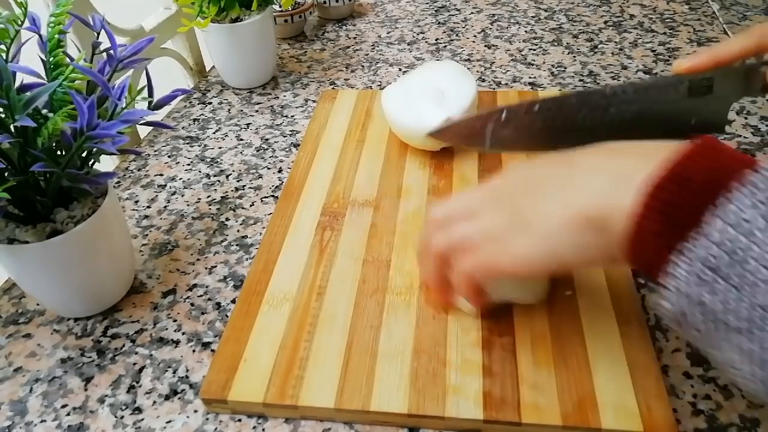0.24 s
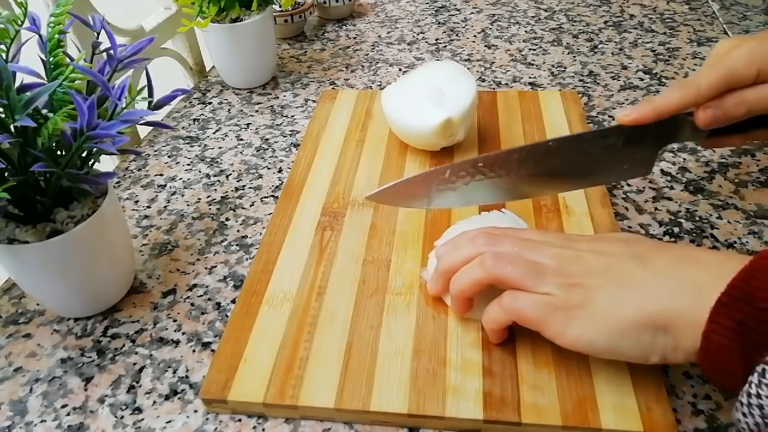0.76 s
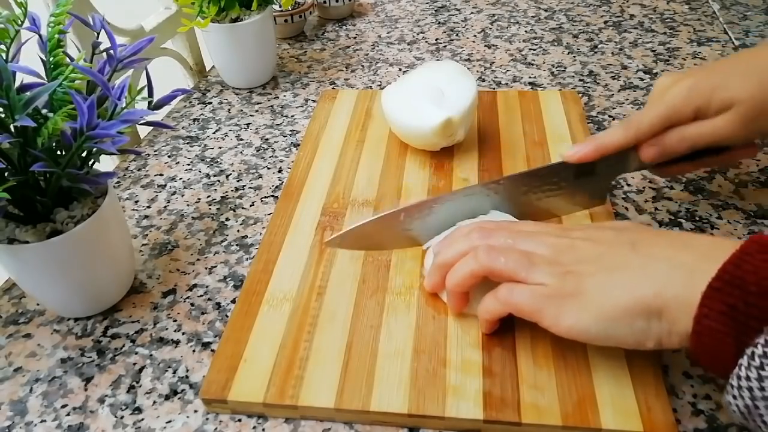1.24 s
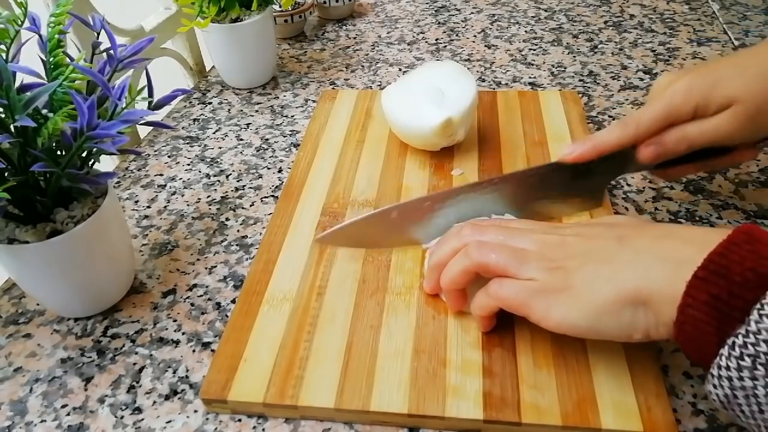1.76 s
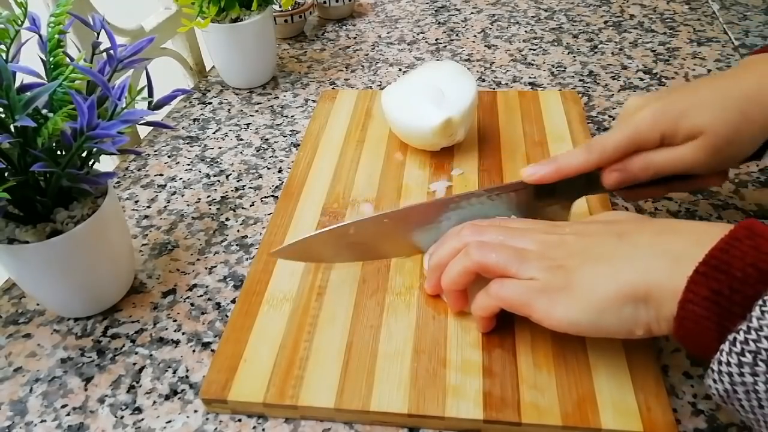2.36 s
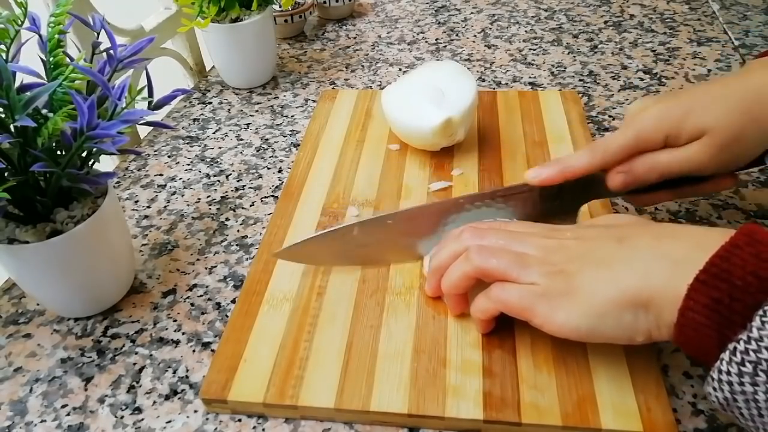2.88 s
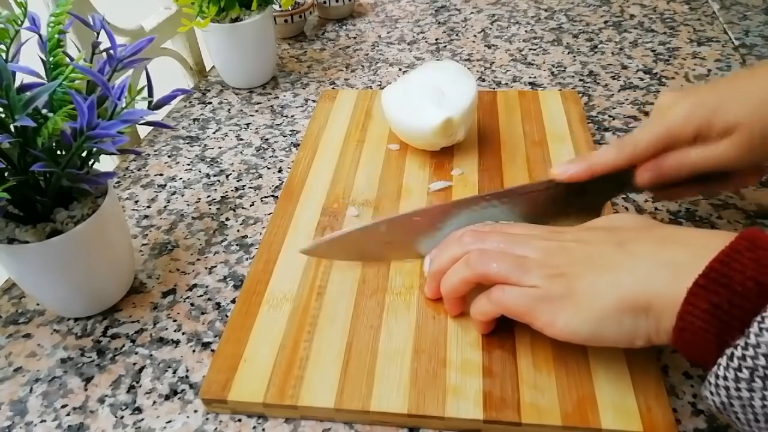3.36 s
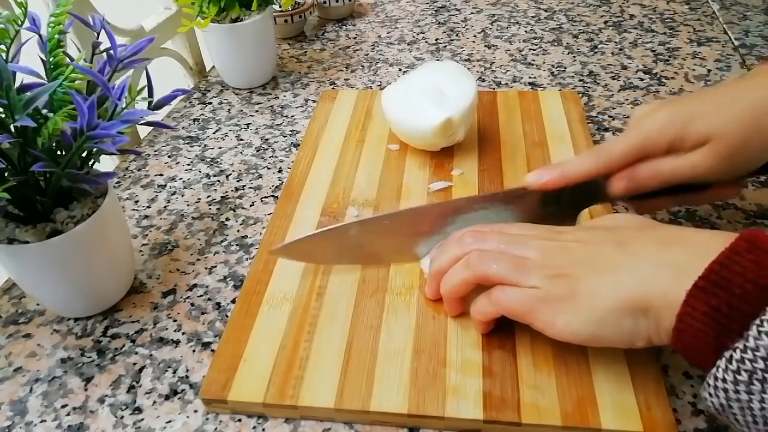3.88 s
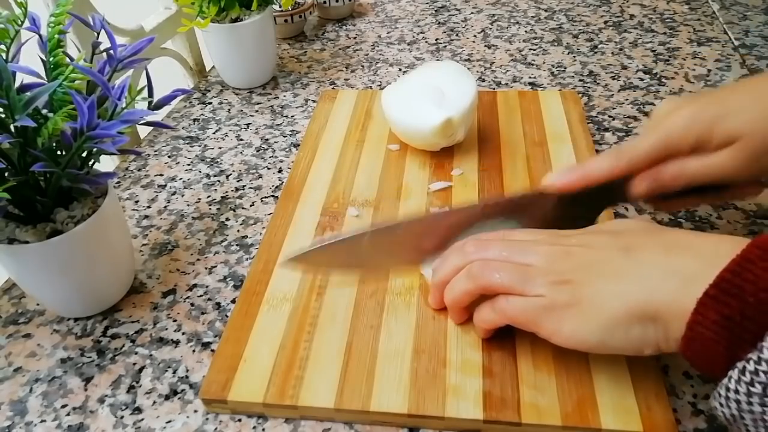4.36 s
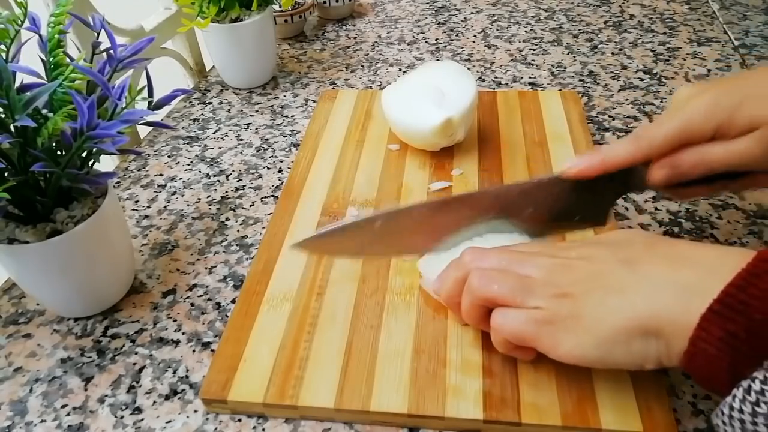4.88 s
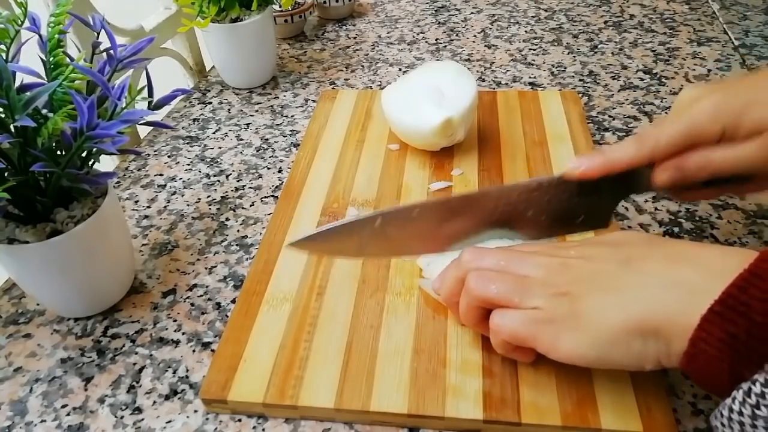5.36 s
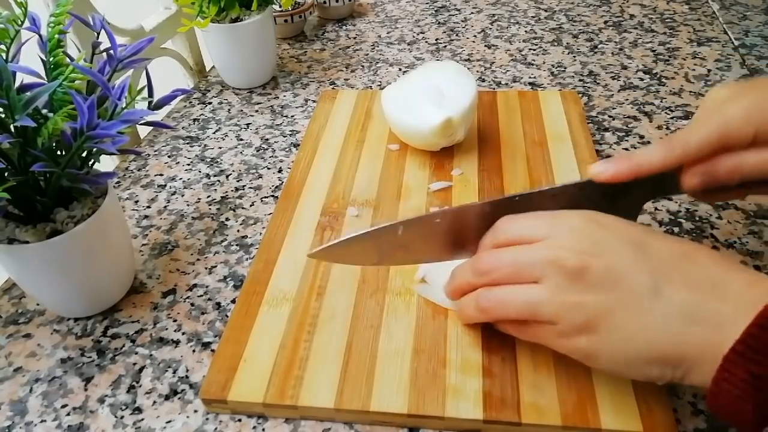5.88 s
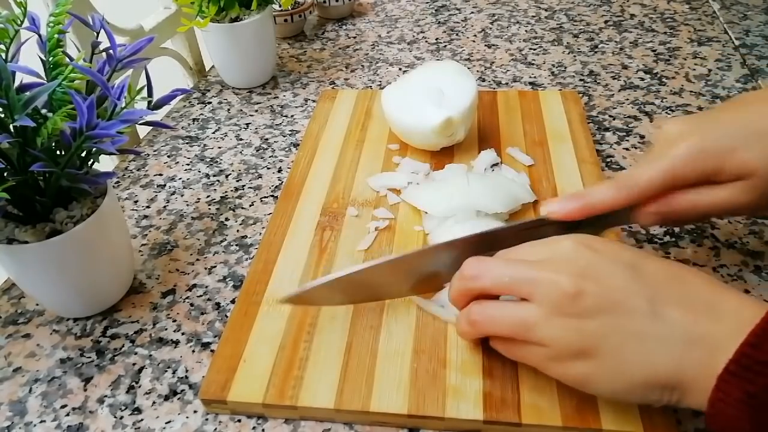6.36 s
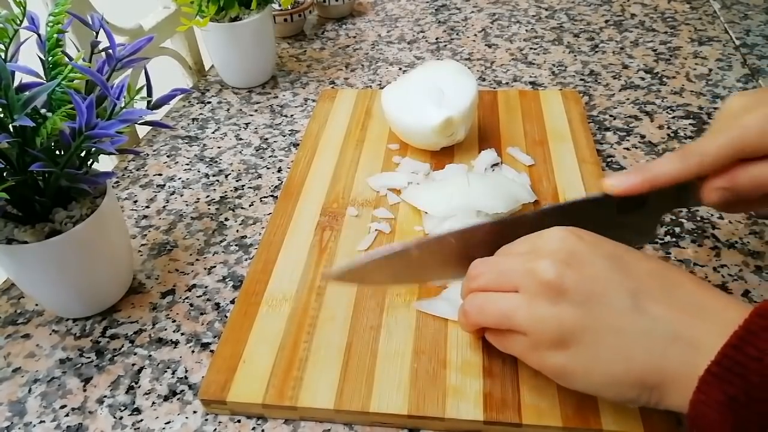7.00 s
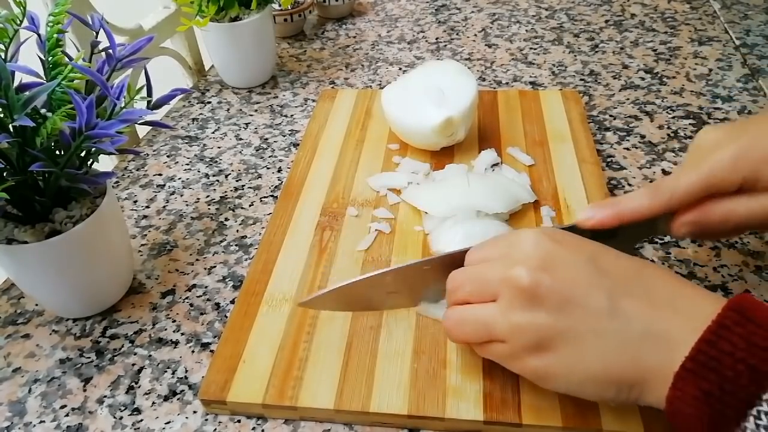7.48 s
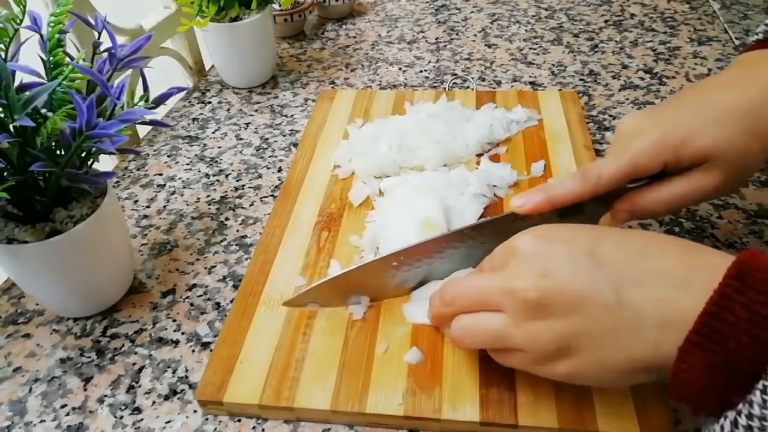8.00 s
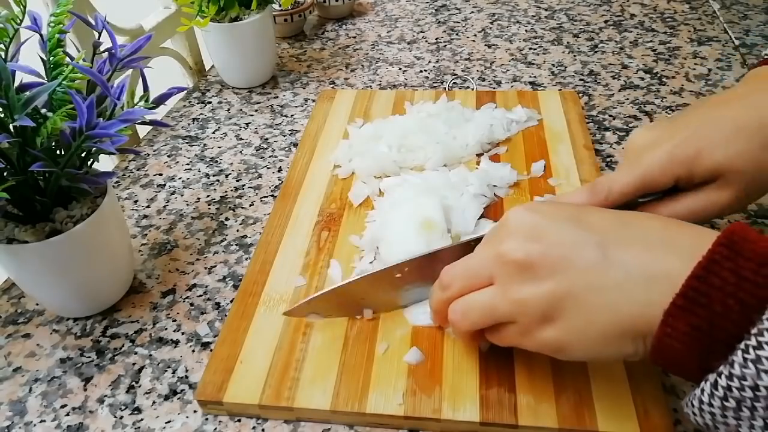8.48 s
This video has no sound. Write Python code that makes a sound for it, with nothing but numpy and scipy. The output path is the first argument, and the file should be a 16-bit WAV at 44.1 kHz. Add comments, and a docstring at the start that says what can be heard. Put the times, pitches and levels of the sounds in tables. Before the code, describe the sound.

Close to the microphone, a knife crunches through onion layers and knocks on a wooden cutting board at an even, unhurried pace. The knocks vary in force, with two sharp ones near the middle, and ring briefly in a small kitchen over low hiss and faint hand rubbing. Late on, everything fades out, then cuts back in for three more strokes and a tiny squeak.

```python
"""A small kitchen: a chef's knife dices an onion on a wooden board on a stone counter, heard close up.
Each stroke crunches through bursting cells and snapping layers, then knocks on the board, ringing its
modes and the room; hard hits click and bounce. Behind: hand rub, hiss, a brief hum, one faint squeak.
The sound fades out once and returns abruptly for the last three strokes."""
import sys
import numpy as np
from scipy import signal
from scipy.fft import rfft, irfft, next_fast_len
from scipy.io import wavfile
from scipy.ndimage import uniform_filter1d

SR = 44100
rng = np.random.default_rng(int(sys.argv[2]) if len(sys.argv) > 2 else 0)


def master_out(mix):
    """Clip the mix to full scale and print it as 16-bit PCM to the path in sys.argv[1]."""
    frames = np.transpose(np.atleast_2d(mix))
    ceiling = np.clip(frames, -1, 1)
    pcm = np.round(ceiling * 32767).astype(np.int16)
    wavfile.write(sys.argv[1], SR, pcm)


N = 385434

# knife strokes: [contact t/s, knock level/dB, hardness f/Hz, crunch level/dB, crunch lead/s, arm lean/dB]
KNIFE_STROKES = [(0.9849, -19, 860, -55.5, 0.016, -54.5), (1.6512, -26, 860, -55, 0.047, -59),
                 (2.1277, -16.5, 870, -54, 0.063, -51.5), (2.6898, -10.5, 1060, -55, 0.042, -48.5),
                 (3.1867, 0.5, 2434, -56, 0.0027, -54.5), (3.7430, -18, 780, -53.5, 0.034, -46.5),
                 (4.2685, -15, 980, -51.5, .055, -47), (4.7781, -2.5, 1850, -51, 0.026, -48.5),
                 (5.3330, -28.5, 624, -53, 0.064, -46.5), (5.8609, -23, 1070, -55, 0.003, -50.5),
                 (6.607, -13, 1630, -62, 0.0028, -60), (7.0404, -21.5, 923, -59.5, 0.027, -59.5),
                 (7.3553, -26.5, 997, -61.5, .005, -63), (7.7073, -15, 2250, -66, .004, -67.5),
                 (8.1910, -18.5, 1780, -61, 0.014, -62), (8.6230, -19.5, 1560, -62.5, 0.008, -64)]
# loudest onion layers snapping: [t/s, level/dB]
LAYER_SNAPS = [(0.9844, -30), (2.662, -40), (4.19, -34), (4.2023, -45), (5.8512, -34)]
# board modes: [f/Hz, width/Hz, level/dB, left minus right/dB, bearing (<= -1 right, >= 1 left)]
BOARD_MODES = [(134.1, 19, -20, -3.5, 1), (300.2, 11, 2, 2.5, -3.8), (462.7, 23, -2, -2, 0.41),
               (548, 53, -2.5, 6, -1.2), (654, 17, -9.5, -7.5, 0.89), (797, 58, -12.5, 11, -0.7),
               (784, 200, -14.5, 8, -2.8), (922, 15, -2.5, 7, 0.39), (963, 23, -10, -13.5, 0.28),
               (1065, 110, 2.5, 4.5, 0.64), (1148, 55, -9, -9.5, -2.5), (1360, 77, -2, -12, 0.98),
               (1400, 14, -9, 19, -0.26), (1534, 60, -1.5, -1.5, 0.29), (1652, 220, -5.5, -10, 0.23),
               (1730, 110, -10.5, 15.5, -1.3), (1950, 70, -14.5, 13.5, .4), (2140, 17, -7, -11.5, 0.031),
               (2280, 18, -11.5, 15, 1), (2250, 78, -23, 10, -1.3), (2840, 300, -31, -14, 0.82),
               (3430, 170, -28, 5.5, -1.3)]
# spectrum of bursting cells: [f/Hz, relative level/dB]
CRUNCH_SPECTRUM = [(30, -2), (80, -4), (180, 9.5), (300, 12.5), (620, 6.5), (1000, 3.5), (1500, -20),
                   (2100, -1.5), (3200, 5.5), (5000, -0.5), (8000, -4.5), (10000, 0), (12000, -14)]
# standing waves of the kitchen: [f/Hz, width/Hz, level/dB]
ROOM_MODES = [(127.5, 3.5, 11.5), (132.5, 4, 12.5), (255, 7, -4), (298, 11, -1.5), (316, 11, 3.5)]
# first reflections off tiles and cupboards: [delay/s, left level/dB, right level/dB]
REFLECTIONS = [(.0042, -7, -12), (.0092, -15, -18), (.0268, -16, -18)]
# reverberation time: [f/Hz, t60/s]
ROOM_DECAY = [(150, 0.91), (400, 0.33), (1100, 0.53), (2500, 0.38), (5000, 0.27), (10000, 0.16)]
# fingers regripping the onion: [t/s, level/dB]
FINGER_GRIPS = [(.2, -74), (1.95, -73), (2.56, -64), (4.0, -82), (5.62, -65.5), (8.52, -68.5)]
# room and microphone hiss: [f/Hz, relative level/dB]
HISS_SPECTRUM = [(25, -1), (60, -7), (125, 2), (190, -2), (350, 1), (630, -1), (1200, 0), (1550, -4.5),
                 (2200, -1), (2800, 1.5), (3200, -3.5), (7000, -7.5), (9700, -10.5), (12000, -15)]

FADE_START_S, SILENT_S, RETURN_S, FADE_IN_S = 5.9, 7.465, 7.508, .017
TOP_HZ = 11600
TIME_S = np.arange(N) / SR
N_FFT = next_fast_len(N + SR)
FREQ_HZ = np.maximum(np.fft.rfftfreq(N_FFT, 1 / SR), 1e-3)


def knocks(wood, rattle_db=-12, rattle_s=.0044, click_s=.0016, neutral_db=-15, weight_hz=600):
    """The edge strikes the board: onion cushions the push, a clean hit reaches the high modes."""
    t = TIME_S[:SR // 20]
    ring, impulse = irfft(wood[0], N_FFT)[:len(t)], signal.unit_impulse(len(t))
    burst = lambda decay_s: noise_burst(t, decay_s) / np.sqrt(decay_s * SR / 2)
    force, rattle, steel = np.zeros(N), np.zeros((2, N)), np.zeros(N)
    for at_s, db, hard_hz, *_ in KNIFE_STROKES:
        blow = impulse + undb(-19) * burst(.0011)  # each spot favours other modes
        push = signal.lfilter(*signal.butter(3, hard_hz, fs=SR), blow)
        bass_gain = undb(.55 * (neutral_db - db))  # lighter knocks weigh more in the low modes
        push = push + (bass_gain - 1) * signal.lfilter(*signal.butter(1, weight_hz, fs=SR), push)
        gain = undb(db) / np.abs(signal.fftconvolve(push, ring)).max()
        add(force, at_s, gain * push)
        shared = burst(rattle_s)  # weak, short modes of board and blade, partly alike at both ports
        for channel in rattle:
            shiver = shared + undb(-4) * burst(rattle_s)
            add(channel, at_s, gain * signal.fftconvolve(push, shiver)[:len(t)])
        click_gain = gain * hardness_gain(hard_hz, bare_db=-53, db_per_octave=6)
        add(steel, at_s, click_gain * noise_burst(t, click_s))
    body = filtered(-force, wood) + undb(rattle_db) * filtered(rattle, resonance(1000, 2100) ** 2)
    return body + pan(4) * filtered(steel, resonance(4400, 6200))


def board_response(port_gap_s=.00025):
    """Board modes at both microphone ports; each radiates from its own side."""
    response = 0
    for hz, width_hz, db, pan_db, bearing in BOARD_MODES:
        arrival = np.array([delay(0), delay(port_gap_s * np.clip(bearing, -1, 1))])
        response += undb(db) * pan(pan_db) * resonance(hz, width_hz) * arrival
    return response


def bounces(wood, lag_s=.0069):
    """The edge lands again and rings the board's high modes."""
    hits, high_modes = np.zeros(N), wood * resonance(2200, 900) ** 2
    for at_s, _, hard_hz, *_ in KNIFE_STROKES:
        add(hits, at_s + lag_s, [hardness_gain(hard_hz, bare_db=-14.5, db_per_octave=24.5)])
    return filtered(hits, high_modes) / np.abs(irfft(high_modes, N_FFT)).max()


def hardness_gain(hard_hz, bare_db, db_per_octave, bare_hz=2800):
    """Gain falls from its bare-edge value as onion cushions the contact."""
    return undb(bare_db + db_per_octave * np.log2(hard_hz / bare_hz))


def crunch(wood, cells_per_s=3500, scatter_db=6, clump_db=2.36, tear_db=-6, rasp_db=-14, rumble_db=-10):
    """Cells burst in clumps; the arm's lean drives blade rasp, board ring and counter rumble."""
    effort, pressure = np.zeros(N), np.zeros(N)
    for at_s, _, _, db, lead_s, lean_db in KNIFE_STROKES:
        cut = cut_envelope(at_s, lead_s)
        effort += undb(db) * cut
        pressure += undb(lean_db) * cut
    pops = (rng.random(N) < cells_per_s / SR) * rng.choice([-1, 1], N)
    pops = pops * undb(scatter_db * np.minimum(rng.exponential(size=N), 4))
    tearing = undb(tear_db) * rng.standard_normal(N)
    cells = (unit_rms(pops) + tearing) * undb(clump_db * drift(160))
    shadow = pan(6) ** (FREQ_HZ / (FREQ_HZ + 1500))  # right port shaded from the treble
    airborne = filtered(cells * effort, shadow * unit_rms(spectrum(CRUNCH_SPECTRUM)))
    rasp = undb(rasp_db) * unit_rms(np.abs(resonance(1450, 600)) ** 2)
    board_and_blade = filtered(cells * pressure, 2 * wood * resonance(1400, 2400) + rasp)
    rumble = unit_rms(filtered(diffuse_noise(90), resonance(55, 36) ** 2))
    return airborne + board_and_blade + undb(rumble_db) * rumble * uniform_filter1d(pressure, SR // 10)


def cut_envelope(contact_s, lead_s, build_s=.041, ease_s=.16, release_s=.0047):
    """A cut builds to 1, eases once the blade is through and stops at the board."""
    past_peak_s = TIME_S - (contact_s - lead_s)
    release = np.maximum(TIME_S - contact_s, 0) / release_s
    return np.exp(np.minimum(past_peak_s / build_s, -past_peak_s / ease_s) - release)


def snaps(per_cut=3, over_crunch_db=6, spread_s=.028, scatter_db=3, decay_s=.0005):
    """Whole layers give way in short, bright cracks; lesser ones cluster at each cut's peak."""
    cracks, t = np.zeros(N), TIME_S[:SR // 100]
    lesser = [(min(at_s, at_s - lead_s + spread_s * when), db + over_crunch_db + scatter_db * size)
              for at_s, _, _, db, lead_s, _ in KNIFE_STROKES
              for when, size in rng.standard_normal((per_cut, 2))]
    for at_s, db in LAYER_SNAPS + lesser:
        crack = noise_burst(t, decay_s)
        add(cracks, at_s, undb(db) * crack / np.abs(crack).max())
    return pan(5) * filtered(cracks, resonance(4500, 12000) * spectrum([(9000, 7.5), (12000, -10.5)]))


def kitchen(direct, tail_db=-4, onset_s=.0015, build_s=.012, mode_lag_s=.01167):
    """Hard reflections, beating low standing waves and a short diffuse tail."""
    early = sum(undb([[left_db], [right_db]]) * delay(lag_s) for lag_s, left_db, right_db in REFLECTIONS)
    standing = sum(undb(db) * resonance(hz, width_hz) for hz, width_hz, db in ROOM_MODES)
    hz, t, noise_bins = signal.stft(diffuse_noise(900)[:, :SR], SR, nperseg=256)
    t60_s = np.interp(hz, *np.transpose(ROOM_DECAY))
    decay = np.exp(-np.log(1000) * t / t60_s[:, None])
    onset = np.clip((TIME_S[:SR] - onset_s) / build_s, 0, 1)
    tail = signal.istft(noise_bins * decay, SR)[1][:, :SR] * onset
    tone = spectrum([(100, -5), (300, -6), (600, -1), (1100, -5.5),
                     (2200, -6.5), (5000, 4.5), (10000, -1.5)])
    late = rfft(tail, N_FFT) * tone / np.sqrt(SR / 50)
    return filtered(direct, 1 + early + standing * delay(mode_lag_s) + undb(tail_db) * late)


def hand_rub(rest_db=-72.5, grip_half_s=.09, waver_db=3.5):
    """Hand and onion rub unsteadily on the board, swelling at each new grip."""
    grips = sum(undb(db) * np.exp(-((TIME_S - at_s) / grip_half_s) ** 2) for at_s, db in FINGER_GRIPS)
    friction = unit_rms(filtered(diffuse_noise(900), resonance(320, 160) ** 2))
    return friction * (undb(rest_db) + grips) * undb(waver_db * drift(21))


def faint_tone(start_s, end_s, from_hz, to_hz, db):
    """A wavering, gliding tone that swells and dies."""
    progress = np.clip((TIME_S - start_s) / (end_s - start_s), 0, 1)
    swell = np.sqrt(np.abs(np.sin(np.pi * progress)))
    hz = np.interp(TIME_S, [start_s, end_s], [from_hz, to_hz]) * (1 + .0046 * drift(26))
    return undb(db) * swell * np.sin(2 * np.pi * np.cumsum(hz) / SR)


def hiss(early_db=-59.5, late_db=-63):
    """Room and microphone noise, lower after the fade."""
    noise = unit_rms(filtered(diffuse_noise(900), spectrum(HISS_SPECTRUM) * (FREQ_HZ < TOP_HZ)))
    return noise * undb(np.where(TIME_S < RETURN_S, early_db, late_db))


def diffuse_noise(coherent_hz):
    """Noise from all around: alike at both ports in the bass, unrelated in the treble."""
    coherence = 1 / (1 + (FREQ_HZ / coherent_hz) ** 2)
    mid, side = filtered(rng.standard_normal((2, N)), np.sqrt([1 + coherence, 1 - coherence]))
    return np.array([mid + side, mid - side]) / np.sqrt(2)


def noise_burst(t, decay_s):
    """Exponentially decaying white noise."""
    return rng.standard_normal(len(t)) * np.exp(-t / decay_s)


def drift(rate_hz):
    """Random curve, spread near 1."""
    return np.interp(TIME_S * rate_hz, np.arange(1000), rng.standard_normal(1000))


def resonance(hz, width_hz):
    """Response of one damped mode, gain 1 at centre."""
    return 1 / (1 + 1j * (FREQ_HZ ** 2 - hz ** 2) / (FREQ_HZ * width_hz))


def spectrum(points):
    """Gain curve through (f/Hz, level/dB) points."""
    hz, db = np.transpose(points)
    return undb(np.interp(np.log(FREQ_HZ), np.log(hz), db))


def delay(lag_s):
    """Response of a pure delay."""
    return np.exp(-2j * np.pi * FREQ_HZ * lag_s)


def filtered(x, response):
    """Apply a frequency response."""
    return irfft(rfft(x, N_FFT) * response, N_FFT)[..., :N]


def pan(db):
    """Stereo gains for a left-minus-right level."""
    return undb(np.array([[db], [-db]]) / 2)


def add(track, at_s, sound):
    """Mix in place."""
    i = int(at_s * SR)
    track[i:i + len(sound)] += sound[:max(0, N - i)]


def undb(db):
    return 10 ** (np.asarray(db) / 20)


def unit_rms(x):
    return x / np.sqrt(np.mean(x ** 2))


def scene():
    """Chopping in the room, over the background."""
    wood = board_response()
    hum = faint_tone(.03, .8, from_hz=118, to_hz=116, db=-68)
    squeak = faint_tone(8.425, 8.535, from_hz=765, to_hz=690, db=-60)
    chopping = knocks(wood) + bounces(wood) + crunch(wood) + snaps()
    return kitchen(chopping) + hiss() + hand_rub() + hum + squeak


def record(dry, port_hz=7500, port_width_hz=950, port_db=21, ceiling=.28, knee=4):
    """Left port resonance, soft clipping of the hardest knocks, fader, low-pass."""
    port = 1 + undb(port_db) * resonance(port_hz, port_width_hz) * (1j * FREQ_HZ / port_hz) ** -.15
    sound = np.array([filtered(dry[0], port), dry[1]])
    clipped = sound / (1 + np.abs(sound / ceiling) ** knee) ** (1 / knee)
    fader = np.interp(TIME_S, [FADE_START_S, SILENT_S, RETURN_S, RETURN_S + FADE_IN_S], [1, 0, 0, 1])
    lowpass = signal.ellip(10, .2, 70, TOP_HZ, fs=SR, output="sos")
    return signal.sosfilt(lowpass, clipped * fader)


dry = scene()
out = record(dry)
master_out(out)
```